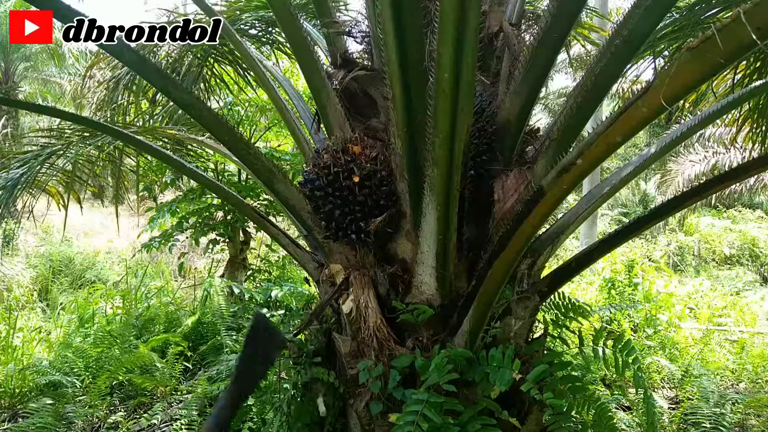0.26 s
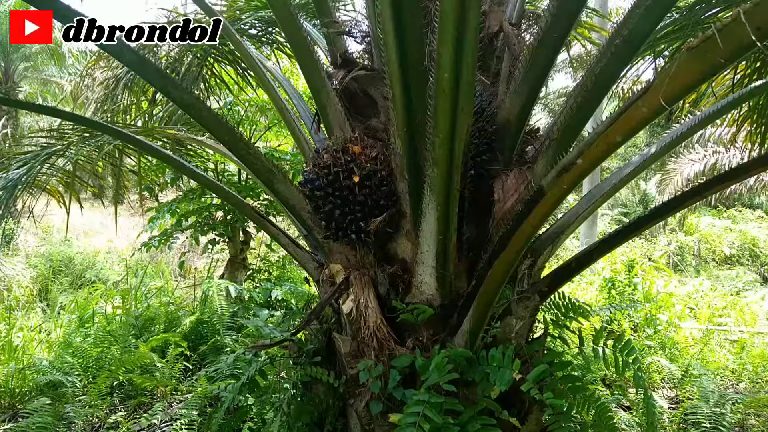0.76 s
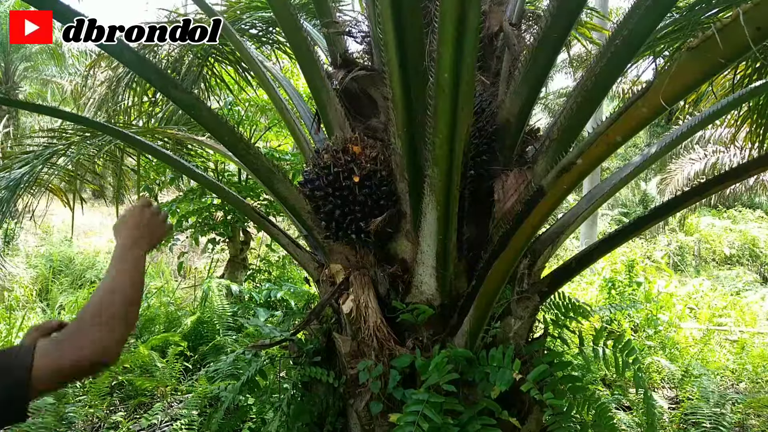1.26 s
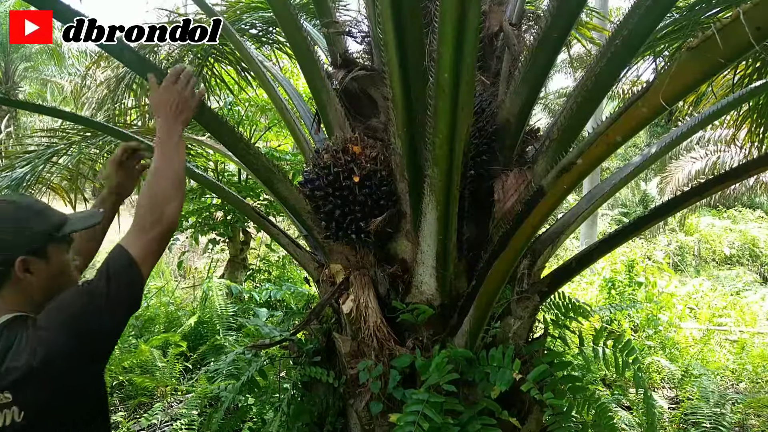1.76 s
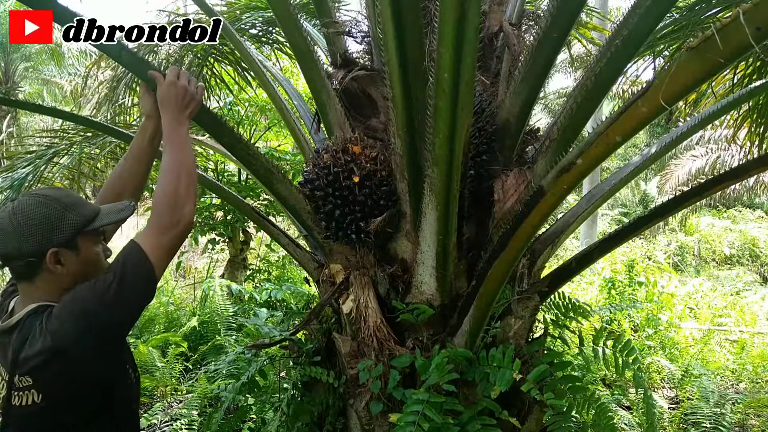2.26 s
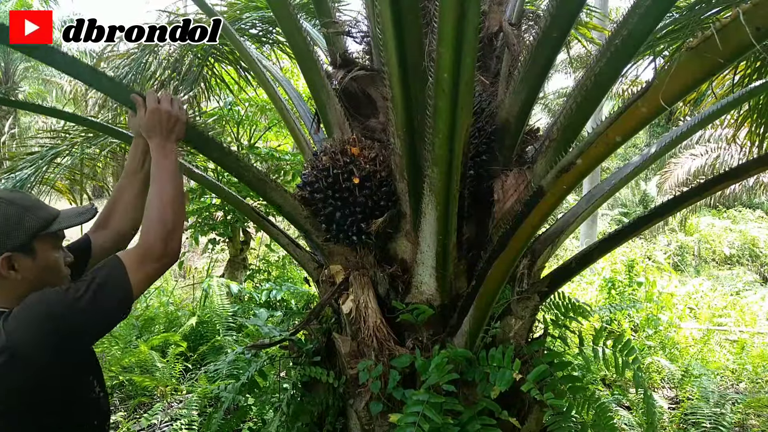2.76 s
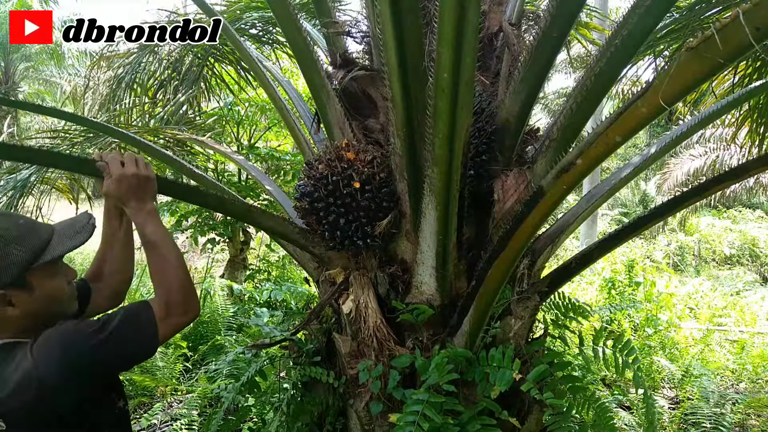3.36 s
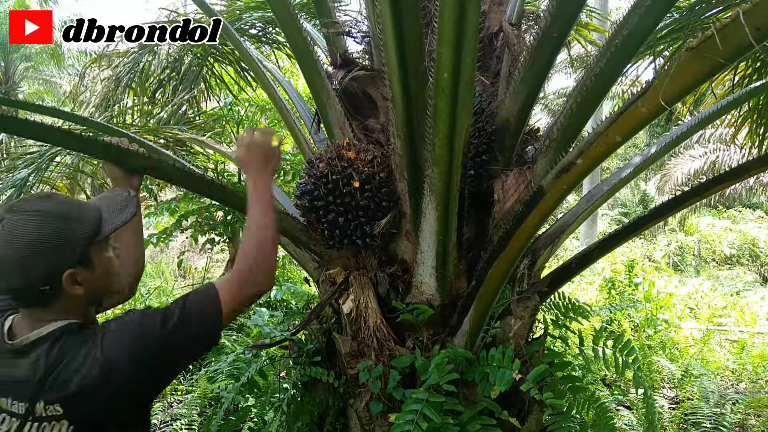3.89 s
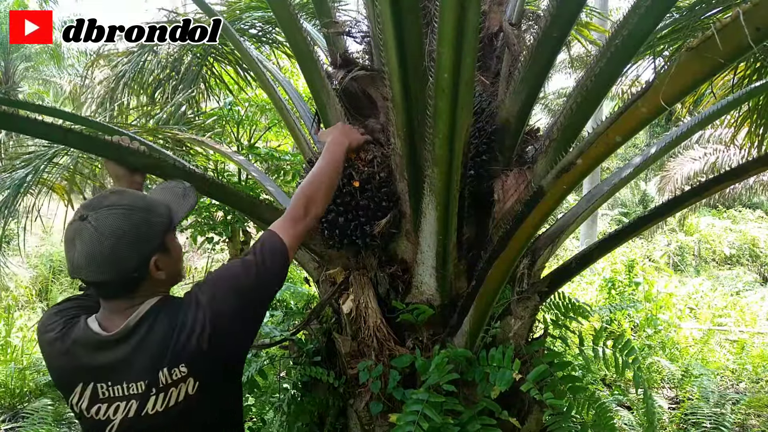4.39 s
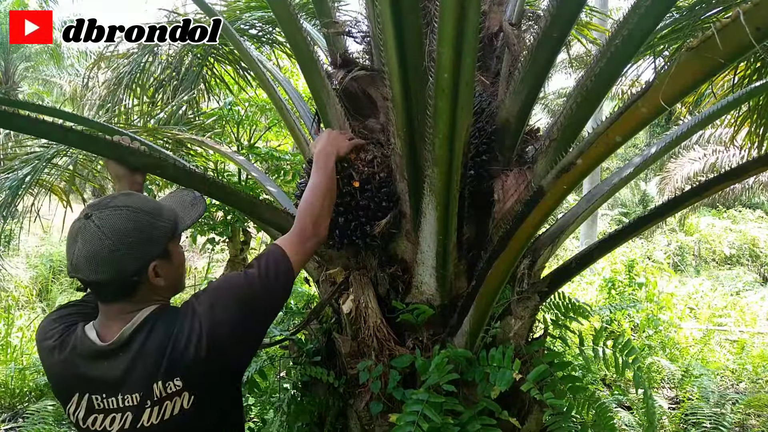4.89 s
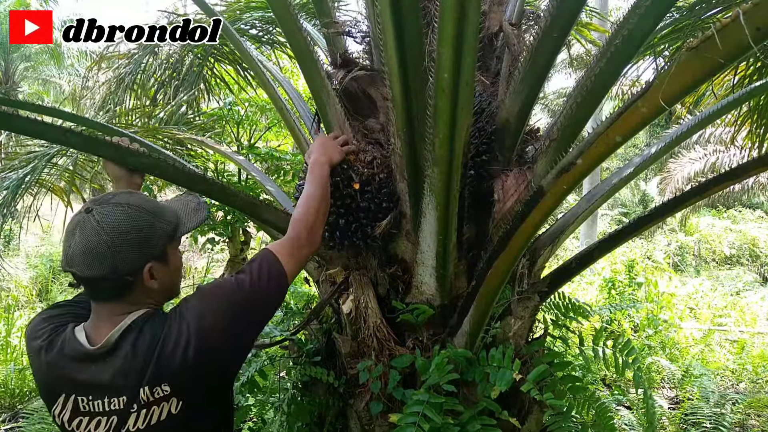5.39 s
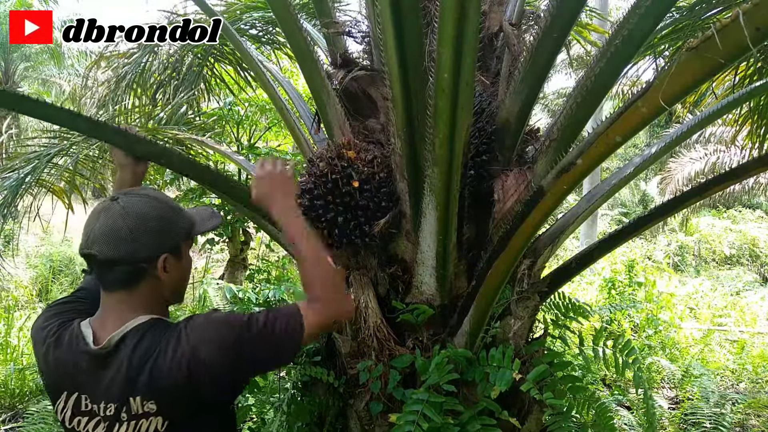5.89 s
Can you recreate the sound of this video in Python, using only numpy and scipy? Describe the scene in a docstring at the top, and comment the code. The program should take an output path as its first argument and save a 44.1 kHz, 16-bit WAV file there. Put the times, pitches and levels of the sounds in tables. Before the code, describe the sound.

A steel-bladed tool clangs down into ferns, then a palm frond is pulled, cracking and rustling, over faint insects and birds.

```python
"""Harvesting a palm

A long-handled blade, thrown into ferns, bounces to rest; each impact excites the damped modes of
steel and handle. The harvester wades to the palm and hauls a frond down: fibres fracture, leaflets
rub, the stalk knocks. Insects shrill, far birds whistle and light wind rumbles on the microphones."""
import sys
import numpy as np
from scipy import signal
from scipy.fft import rfft, irfft
from scipy.io import wavfile
from scipy.ndimage import uniform_filter1d

SR = 44100
rng = np.random.default_rng(int(sys.argv[2]) if len(sys.argv) > 2 else 0)


def put_to_file(sound):
    """Save the sound as 16-bit audio at rate SR, in the file named by the first command-line argument."""
    columns = np.atleast_2d(sound).T  # one column per channel
    safe = np.clip(columns, -1, 1)
    whole_steps = np.round(safe * 32767)
    wavfile.write(sys.argv[1], SR, whole_steps.astype(np.int16))


N = 270774
T = np.arange(N) / SR
HIT_T = np.arange(SR // 3) / SR  # time axis of one impact

# All levels are relative. Correlation between the two microphones: f/Hz, coefficient
CORRELATION = [(30, 0.21), (130, 0.73), (300, 1), (700, 0.94), (1400, 0.51), (3100, 0.052), (6800, 0.012)]
# Mismatch of the microphones: f/Hz, left minus right/dB
MIC_BALANCE = [(100, -1.5), (400, -0.5), (1000, -1.6), (2400, 0), (3800, -1), (5800, 3), (8500, 0.5),
               (15000, -0.5)]
# Spectrum of the distant hiss: f/Hz, level/dB
AIR_SPECTRUM = [(30, 7.5), (120, 6), (300, 3), (650, -2), (1150, -13), (1650, -8.5), (2000, 0.5),
                (3000, -4), (5000, 1), (6200, -8.5), (9200, -8), (10800, -25.5), (13000, -26.5),
                (16000, -22.5)]
# Spectrum of the insect chorus: f/Hz, level/dB
INSECT_SPECTRUM = [(5500, -40), (6400, -17.5), (6800, -4), (7050, 0.5), (7300, -5), (7800, -14),
                   (9000, -38.5), (13000, -53), (14100, -29.5), (15500, -43.5)]
# Strength of the breeze: t/s, level/dB
BREEZE = [(0.0, -58.5), (0.4, -56), (1.0, -47), (1.55, -44.5), (2.1, -53.5), (2.6, -55), (3.3, -50.5),
          (3.7, -52.5), (4.4, -55.5), (4.7, -46.5), (4.92, -56), (6.14, -52.5)]
# Spectrum of the wind rumble: f/Hz, level/dB
RUMBLE_SPECTRUM = [(10, 6.5), (25, 4.5), (48, -0.5), (75, -14.5), (120, -19), (250, -36.5), (700, -56.5)]
# Puffs of wind on the microphones: t/s, level/dB, decay time/s
GUSTS = [(1.27, -44, 0.03), (1.55, -32, 0.018), (1.659, -44, 0.023), (1.765, -34.5, 0.013),
         (2.935, -40.5, 0.021), (3.107, -38, 0.013), (4.133, -43.5, .018), (5.021, -37.5, 0.011),
         (5.508, -41.5, 0.014)]
# Spectrum of the buffeting: f/Hz, level/dB
BUFFET_SPECTRUM = [(20, 0), (45, -1.5), (90, -9.5), (140, -26.5), (300, -36), (1000, -64)]
# Held notes of one bird: t/s, duration/s, level/dB
WHISTLES = [(0.04, 0.43, -55), (3.724, 0.45, -59.5)]
# Swooping calls of a second bird: t/s, duration/s, level/dB
SWOOPS = [(2.306, 0.26, -57.5), (4.373, 0.24, -58.5), (5.477, 0.25, -59)]
# Contour of each swoop: fraction of the call, f/Hz, level/dB
SWOOP_CONTOUR = [(0, 3130, -6), (0.15, 3467, -0.5), (0.23, 3350, -5), (0.3, 2887, 2.5), (0.48, 2830, -2.5),
                 (0.68, 3000, -0.5), (0.83, 3370, -0.5), (1, 3740, -4)]
# Strokes through the ferns: peak t/s, rise/s, fall/s, leaf level/dB, stem level/dB
FERN_STROKES = [(0.1, 0.19, .55, -59, -75), (0.43, 0.042, 0.2, -47.5, -68.5),
                (0.56, 0.097, .05, -53.5, -53.5), (0.70, 0.037, 0.21, -43.5, -52),
                (0.88, .05, 0.037, -45.5, -59), (1.28, 0.16, 0.19, -54, -71.5),
                (1.52, 0.16, 0.1, -50.5, -57), (1.70, 0.14, .22, -59.5, -76)]
# Spectrum of rubbing ferns: f/Hz, level/dB
FERN_SPECTRUM = [(120, -24.5), (220, -4), (400, -1.5), (700, -3.5), (1300, -7), (1900, -5.5), (2400, -4.5),
                 (3300, 0), (4600, -0.5), (7000, 0), (9000, -7), (10800, -15), (15500, -17.5)]
# Swings of the hauled frond: peak t/s, rise/s, fall/s, leaf level/dB, stem level/dB
FROND_SWINGS = [(2.76, 0.072, 0.18, -63, -78), (3.0, 0.091, 0.19, -55, -67.5),
                (3.24, 0.12, 0.22, -51, -58.5), (3.56, 0.34, 0.29, -47.5, -54.5),
                (4.02, 0.17, 0.66, -60.5, -70), (5.78, 0.11, 0.25, -61.5, -72.5),
                (6.03, 0.17, 0.16, -57.5, -66.5)]
# Spectrum of the swishing frond: f/Hz, level/dB
FROND_SPECTRUM = [(120, -33), (200, -11.5), (554, -5), (798, -7.5), (906, -9), (992, -11.5), (1330, -11.5),
                  (1540, -7), (2250, 0.5), (3300, -1.5), (6830, -2), (10800, -17.5), (15500, -26)]
# Fractures in stalks and litter: t/s, level/dB, decay time/s, tilt/(dB/octave), left minus right/dB
SNAPS = [(0.015, -43, 0.013, -3, 0.5), (1.874, -45, 0.0018, 5, -3), (2.503, -33.5, 0.0031, -1, 4),
         (2.509, -47, 0.02, 3.5, -2), (2.6277, -36.5, 0.0033, 1.5, -1), (2.6675, -37.5, 0.0034, 1, 0),
         (2.804, -36.5, 0.021, 2, 1), (2.8154, -25, 0.0025, -1, 1.5), (2.832, -42, 0.0051, -1, -2),
         (3.048, -33, .002, 1, 3), (3.056, -32, 0.0018, -1, -2), (3.1792, -20.5, 0.0025, 3, -2.5),
         (3.2395, -34, 0.0024, -3.5, -1), (3.2978, -23, 0.0011, -3, -3), (3.3007, -29, 0.0046, -4, -4),
         (5.1804, -35, 0.0024, 3, -1), (5.365, -49, 0.0022, 3, 0), (5.403, -48.5, 0.0028, -3.5, 3),
         (5.498, -42, 0.0017, 2.5, 2), (6.0192, -43.5, 0.014, 9.5, -2)]
# Spectrum of a breaking fibre: f/Hz, level/dB
FIBRE_SPECTRUM = [(100, -30.5), (350, -4), (650, -4), (1200, -7), (2300, 3), (4500, 4), (6500, -3.5),
                  (8500, -6), (11000, -23), (16000, -31)]
# Knocks of the stalks: t/s, ring level/dB, crack level/dB, frequency ratio, left minus right/dB
KNOCKS = [(1.394, -46, -52, 0.55, -3), (1.531, -45, -41.5, 0.47, 1), (1.673, -45, -41, 0.56, -3),
          (3.1782, -28.5, -27.5, 0.46, 2), (3.802, -41.5, -45, 0.55, 0.5), (4.0654, -19, -23, 1.01, -1),
          (4.117, -56, -45, 0.96, 0.5), (4.342, -67, -52, 0.93, 0)]
# Modes of a stalk at frequency ratio 1: f/Hz, level/dB, T60/s
STALK_MODES = [(494, -20, .05), (890, -15.5, .045), (1150, -23, 0.026), (1373, -2, 0.032),
               (1807, -15, 0.045), (2000, -18, 0.037), (2615, -22.5, .04), (4570, -25.5, .04)]
# Spectrum of a woody crack: f/Hz, level/dB
WOOD_SPECTRUM = [(100, -14.5), (300, -17.5), (480, -4), (900, -9), (1400, -2), (1900, -3.5), (2400, -14.5),
                 (4500, -17), (7000, -23), (11000, -45.5), (16000, -49.5)]
# Soft treads and bumps on the ground: t/s, level/dB, decay time/s, tilt/(dB/octave)
TREADS = [(0.681, -22, 0.0061, -5), (0.701, -30.5, 0.013, -7), (0.866, -27, 0.006, -8),
          (0.938, -35, 0.024, -1.5), (3.314, -43, 0.01, 3.5), (3.42, -39, 0.018, -7),
          (3.767, -43, 0.017, 3), (4.008, -51, 0.045, 1), (5.975, -52, 0.018, 3)]
# Spectrum of struck soft ground: f/Hz, level/dB
THUD_SPECTRUM = [(30, -11), (90, -5.5), (140, -1), (220, 0.5), (330, 2), (520, -7), (750, -13.5),
                 (1200, -24.5), (3000, -44.5)]
# Landings of the tool: t/s, blade level/dB, handle level/dB, handle frequency ratio,
# crunch level/dB, crunch decay time/s, crunch cutoff f/Hz, thud level/dB
LANDINGS = [(0.6539, -10, -21.5, 1, -20.5, 0.008, 12000, -34.5),
            (0.746, -29, -29, 0.87, -23, 0.0029, 4600, -39),
            (0.7615, -29.5, -34.5, 0.7, -27, 0.012, 4460, -38),
            (0.796, -42, -36, 0.89, -23.5, 0.0069, 3440, -45),
            (0.8023, -32, -33, .8, -25.5, 0.013, 9200, -41),
            (0.837, -50, -29, 0.543, -16.5, 0.0043, 4000, -25),
            (0.9026, -37, -29.5, .67, -13, 0.0022, 5560, -25.5),
            (0.9205, -34, -27.5, 0.84, -25.5, 0.0068, 4940, -28.5)]
# Modes of the steel blade: f/Hz, level/dB, T60/s
BLADE_MODES = [(2820, -14.5, .08), (3600, 2, 0.027), (3770, -3, 0.087), (5050, -8.5, 0.078),
               (5575, -24, 0.091), (5570, -17, 0.1), (6200, -13, 0.0776), (6457, -4.5, 0.11),
               (6740, -16, .11), (7520, -21, 0.079), (8740, -16, 0.089), (8890, -14, 0.059)]
# Modes of the handle at ratio 1; it rings lower against the ground: f/Hz, level/dB, T60/s
HANDLE_MODES = [(361, -5, .05), (648, 0.5, 0.075), (930, -7.5, 0.054), (1364, -13, .04), (1714, -8, 0.036)]
# Spectrum of crushed stems: f/Hz, level/dB
CRUNCH_SPECTRUM = [(100, -22), (300, -10), (700, -2), (1300, -5), (2300, 0.5), (3200, -4.5), (4200, -0.5),
                   (5500, -6.5), (8000, -2.5), (11000, -20.5), (16000, -20.5)]


def amp(db):
    """Amplitude ratio of a level in decibels."""
    return 10 ** (np.asarray(db) / 20)


def unit_rms(x):
    """Normalisation to unit mean power."""
    return x / np.sqrt(np.mean(x ** 2) + 1e-20)


def curve_at(points, hz):
    """Interpolation of (f/Hz, value) points on a logarithmic frequency axis."""
    f, value = np.transpose(points)
    return np.interp(np.log(hz + 1), np.log(f + 1), value)


def bins(n):
    """Frequencies of an n-sample Fourier transform."""
    return np.fft.rfftfreq(n, 1 / SR)


def add(mix, s, sound):
    """Superposition of a stereo sound on the mix, from time s."""
    part = mix[:, max(round(s * SR), 0):][:, :sound.shape[1]]
    part += sound[:, :part.shape[1]]


def panned(db):
    """Channel gains for a left-right level difference."""
    return amp([[db / 2], [-db / 2]])


def drift(seconds, n=N):
    """Random fluctuation of unit rms, smoothed over the given time."""
    size = max(int(seconds * SR), 1)
    averaged = uniform_filter1d(rng.standard_normal(n), size, mode="wrap")
    return unit_rms(uniform_filter1d(averaged, size, mode="wrap"))


def noise_pair(n, coherence=1):
    """Partial coherence: white noise at two microphones is related in the bass, not in the treble."""
    a, b = rfft(rng.standard_normal((2, n)))
    c = coherence * curve_at(CORRELATION, bins(n))
    return irfft(np.array([a, c * a + np.sqrt(1 - c ** 2) * b]), n)


def coloured(x, spectrum, tilt_db=0):
    """Minimum-phase filtering at unit power gain, with a tilt per octave."""
    n = x.shape[-1]
    hz = abs(np.fft.fftfreq(n, 1 / SR))
    gain = unit_rms(amp(curve_at(spectrum, hz) + tilt_db * np.log2(np.maximum(hz, 100))))
    response = np.exp(np.conj(signal.hilbert(np.log(gain + 1e-6))))
    return irfft(rfft(x) * response[:n // 2 + 1], n)


def burst(spectrum, decay, rise, grain_db, tilt_db=0):
    """A noise transient: grainy, filtered noise under an exponentially decaying envelope."""
    envelope = (1 - np.exp(-HIT_T / rise)) * np.exp(-HIT_T / decay)
    grains = amp(grain_db * drift(0.00015, len(HIT_T)))
    sound = coloured(noise_pair(len(HIT_T)) * grains * envelope, spectrum, tilt_db)
    return unit_rms(sound) * np.sqrt(np.mean(envelope ** 2))


def struck(modes, contact_s, ring_db, spread_rad, ratio=1):
    """Modal vibration: forced during contact, then decaying freely; phases differ between channels."""
    forced = np.sin(np.pi * np.minimum(HIT_T / contact_s, 1))
    out = 0
    for hz, db, t60 in modes:
        free = amp(ring_db - 60 * HIT_T / t60) * np.minimum(2 * HIT_T / contact_s, 1)
        phase = 2 * np.pi * hz * ratio * HIT_T + spread_rad * rng.standard_normal((2, 1))
        out = out + amp(db) * (forced + free) * np.sin(phase)
    return out


def grove(x, t60, treble_t60):
    """Reverberation: trunks and leaves scatter sound into a tail whose decay depends on frequency."""
    hz, t, z = signal.stft(noise_pair(SR // 2), SR, nperseg=256)
    decay = curve_at([(500, t60), (10000, treble_t60)], hz)[:, None]
    tail = signal.istft(z * amp(-60 * t / decay), SR, nperseg=256)[1]
    tail *= np.minimum(np.arange(tail.shape[1]) / SR / 0.0035, 1)
    return signal.fftconvolve(x, tail / np.linalg.norm(tail[0]), axes=1)[:, :N]


def background():
    """Amplitude-modulated noise: a broad distant hiss and the narrow band of an insect chorus."""
    air = coloured(noise_pair(N, coherence=0.31), AIR_SPECTRUM) * amp(0.39 * drift(0.2))
    insects = coloured(noise_pair(N), INSECT_SPECTRUM) * amp(0.36 * drift(0.15) + 0.8 * drift(0.008))
    return amp(-59.5) * panned(-0.5) * air + amp(-55.5) * panned(-0.3) * insects


def wind(strong_db=-43.5, buffet_growth=2.2):
    """Pressure fluctuations, strongest at the windward microphone; buffeting outgrows the breeze."""
    breeze_db = np.interp(T, *np.transpose(BREEZE))
    buffet_db = -48.5 + buffet_growth * (breeze_db - strong_db)
    out = amp(breeze_db + 2.5) * panned(-4) * coloured(noise_pair(N), RUMBLE_SPECTRUM)
    out += amp(buffet_db) * panned(-12.5) * coloured(noise_pair(N), BUFFET_SPECTRUM)
    for s, db, decay in GUSTS:
        add(out, s, amp(db) * panned(-14.5) * burst(BUFFET_SPECTRUM, decay, rise=0.0042, grain_db=0.5))
    return out


def whistle(hz, db, jitter=0.011, flutter_db=2.5):
    """A sinusoid with slight random frequency and amplitude modulation."""
    n = len(hz)
    pitch = hz * (1 + jitter * drift(0.0047, n))
    level = amp(db + flutter_db * drift(0.0113, n)) * signal.windows.tukey(n, 0.15)
    return panned(0) * level * np.sin(2 * np.pi * np.cumsum(pitch) / SR)


def birds(note_hz=2950, scoop_hz=210.8, scoop_s=0.042, chip_at_s=5.243, chip_s=0.06, chip_hz=7850):
    """Frequency glides: one bird slides up to a held note, one swoops, one gives a thin arched chip."""
    out = np.zeros((2, N))
    for s, length, db in WHISTLES:
        t = np.arange(0, length, 1 / SR)
        pitch = note_hz - scoop_hz * np.exp(-t / scoop_s)
        swell_db = np.interp(t / length, [0, 0.72, 1], [-7, 0, -16])
        add(out, s, whistle(pitch, db + swell_db, jitter=0.00208, flutter_db=3))
    fraction, hz, stress_db = np.transpose(SWOOP_CONTOUR)
    for s, length, db in SWOOPS:
        u = np.arange(0, length, 1 / SR) / length
        add(out, s, whistle(np.interp(u, fraction, hz), db + np.interp(u, fraction, stress_db)))
    arch = np.sin(np.pi * np.arange(0, chip_s, 1 / SR) / chip_s)
    add(out, chip_at_s, whistle(chip_hz + 264 * arch, -57 - 8 * (1 - arch)))
    return out


def stroke_envelopes(strokes, exponent):
    """Incoherent strokes add in power, giving leaf and stem amplitudes; exponent 1 is pointed, 2 round."""
    power = np.zeros((2, N))
    for s, rise, fall, leaf_db, stem_db in strokes:
        from_peak = np.maximum((s - T) / rise, (T - s) / fall)
        swell = np.exp(-np.minimum(from_peak ** exponent, 20))
        power += (amp([[leaf_db], [stem_db]]) * swell) ** 2
    return np.sqrt(power)


def leaflets(x, patch_db):
    """Spectral modulation: each leaflet that slides past favours its own band for a moment."""
    z = signal.stft(x, nperseg=512)[2]
    across_bands = uniform_filter1d(rng.standard_normal(z.shape[1:]), size=6, axis=0)
    patches = unit_rms(uniform_filter1d(across_bands, size=5, axis=1))
    return signal.istft(z * amp(patch_db * patches), nperseg=512)[1][:, :N]


def rustle(envelopes, spectrum, grain_db, clump_db, coherence, crossover_hz=1800):
    """Friction noise: leaflets tick together above the crossover, heavier stems scrape below it."""
    leaves, stems = envelopes
    ticks = noise_pair(N, coherence)
    ticks *= amp(grain_db * np.array([drift(0.00018), drift(0.00014)]) + clump_db * drift(0.0085))
    z, hz = rfft(coloured(leaflets(ticks, patch_db=2.2), spectrum)), bins(N)
    upper = 1 / (1 + (crossover_hz / (hz + 1)) ** 6)
    out = 0
    for level, share, low_hz, high_hz in ((leaves, upper, 2500, 6200), (stems, 1 - upper, 400, 1500)):
        band_rms = irfft(z.mean(0) * share * (hz > low_hz) * (hz < high_hz), N).std()
        out = out + irfft(z * share, N) / band_rms * level
    return out


def crackle(leaves, held_from_s=2, rest_per_s=4.8, extra_per_s=62):
    """A Poisson process: small fibres give more often and more loudly the harder the held frond moves."""
    out = np.zeros((2, N))
    chance, size, side = rng.random(N), rng.standard_normal(N), rng.standard_normal(N)
    rate = rest_per_s + extra_per_s * (leaves / leaves.max()) ** 2
    ticks = [burst(FIBRE_SPECTRUM, decay=0.0015, rise=0.00025, grain_db=8) for _ in range(20)]
    for i in np.flatnonzero((chance < rate / SR) & (T > held_from_s)):
        level = (leaves[i] + amp(-55)) * amp(1.5 + 0.5 * min(size[i], 2))
        add(out, T[i], level * panned(2 * side[i]) * ticks[i % len(ticks)])
    return out


def harvesting():
    """Fracture and impact: fibres snap, knocked stalks crack and resonate, treads thud on the soil."""
    out = np.zeros((2, N))
    for s, db, decay, tilt_db, pan_db in SNAPS:
        snap = burst(FIBRE_SPECTRUM, decay, rise=0.00015, grain_db=5, tilt_db=tilt_db)
        add(out, s, amp(db) * panned(pan_db) * snap)
    for s, ring_db, crack_db, ratio, pan_db in KNOCKS:
        ring = struck(STALK_MODES, contact_s=0.0078, ring_db=-15, spread_rad=0.33, ratio=ratio)
        crack = burst(WOOD_SPECTRUM, decay=0.0053, rise=0.00036, grain_db=4.5)
        add(out, s, panned(pan_db) * (amp(ring_db) * ring + amp(crack_db) * crack))
    for s, db, decay, tilt_db in TREADS:
        add(out, s, amp(db) * burst(THUD_SPECTRUM, decay, rise=0.0012, grain_db=-3, tilt_db=tilt_db))
    return out


def falling_tool():
    """Impact excitation: each landing rings blade and handle, crushes stems and thumps the soil."""
    out = np.zeros((2, N))
    for s, blade_db, handle_db, ratio, crunch_db, decay, cutoff_hz, thud_db in LANDINGS:
        blade = struck(BLADE_MODES, contact_s=0.0043, ring_db=-14, spread_rad=0.21)
        handle = struck(HANDLE_MODES, contact_s=0.004, ring_db=-1, spread_rad=0.2, ratio=ratio)
        lowpass = signal.butter(4, cutoff_hz, fs=SR, output="sos")
        crunch = signal.sosfilt(lowpass, burst(CRUNCH_SPECTRUM, decay, rise=0.00011, grain_db=5.5))
        thud = burst(THUD_SPECTRUM, decay=0.016, rise=0.00097, grain_db=-2)
        add(out, s, amp(blade_db) * blade + amp(handle_db) * handle)
        add(out, s, amp(crunch_db) * crunch + amp(thud_db) * thud)
    return out


def scene():
    """Superposition of far and near sources; the far birds carry the larger share of reverberation."""
    brushing = stroke_envelopes(FERN_STROKES, exponent=0.89)
    hauling = stroke_envelopes(FROND_SWINGS, exponent=1.42)
    ferns = rustle(brushing, FERN_SPECTRUM, grain_db=2, clump_db=0.95, coherence=0.49)
    frond = rustle(hauling, FROND_SPECTRUM, grain_db=3, clump_db=0, coherence=0.1)
    outdoors, calls = background() + wind(), birds()
    far_birds = amp(-5.5) * (calls + grove(calls, t60=0.53, treble_t60=0.5))
    impacts = falling_tool() + harvesting()
    early = amp(-6.5) * grove(impacts, t60=0.064, treble_t60=0.12)
    late = amp(-26) * grove(impacts, t60=0.44, treble_t60=0.28)
    return outdoors + far_birds + ferns + frond + crackle(hauling[0]) + impacts + early + late


def record(dry, ceiling=0.85, cutoff_hz=15850):
    """Transduction: two unequal microphones saturate softly on the loudest clang; a low-pass follows."""
    mismatch_db = np.outer([0.5, -0.5], curve_at(MIC_BALANCE, bins(N)))
    uneven = irfft(rfft(dry) * amp(mismatch_db), N)
    saturated = ceiling * np.tanh(uneven / ceiling)
    lowpass = signal.firwin(511, cutoff_hz, window=("kaiser", 9), fs=SR)
    return signal.oaconvolve(saturated, lowpass[None], "same")


dry = scene()
out = record(dry)
put_to_file(out)
```